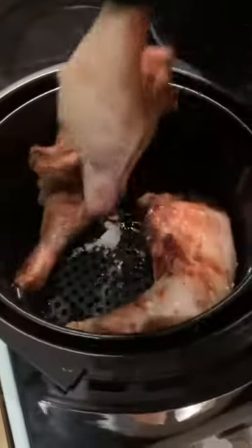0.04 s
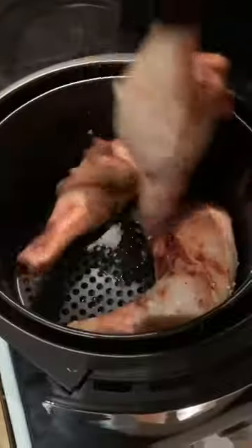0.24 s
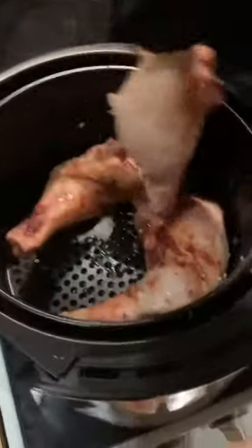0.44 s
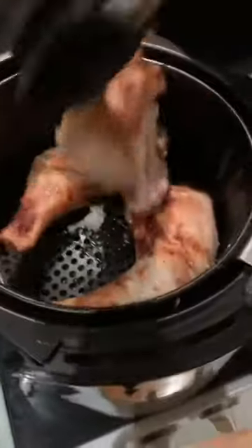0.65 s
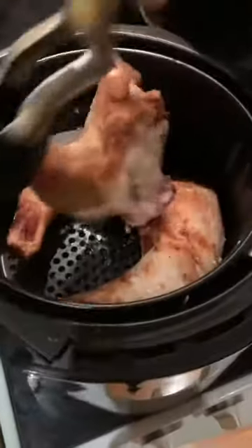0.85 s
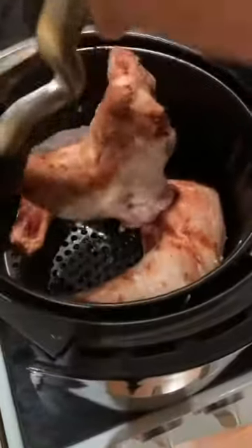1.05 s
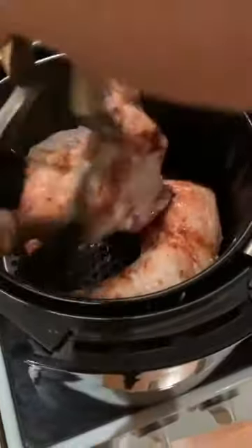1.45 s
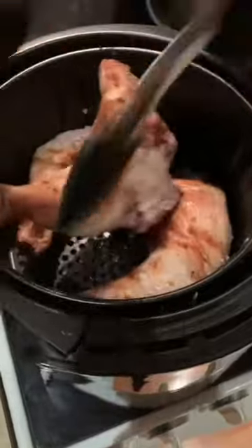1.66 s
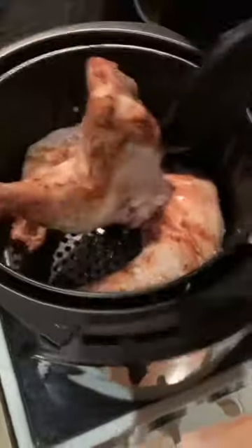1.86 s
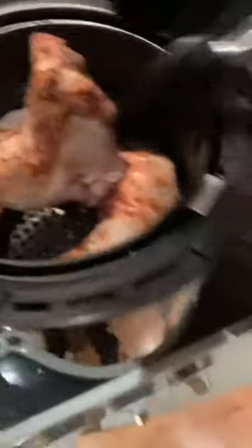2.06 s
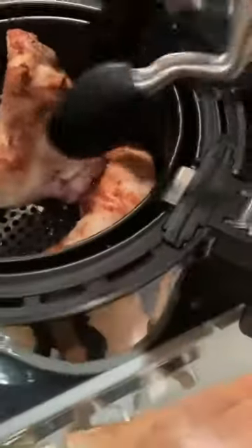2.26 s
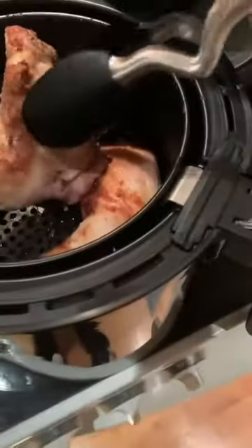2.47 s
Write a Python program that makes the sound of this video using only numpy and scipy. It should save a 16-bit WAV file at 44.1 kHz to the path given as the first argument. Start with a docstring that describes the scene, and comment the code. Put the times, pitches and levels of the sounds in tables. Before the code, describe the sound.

Metal tongs scrape an air fryer basket, close up in a quiet kitchen. After a soft rub of chicken, two hissing, ringing scrapes come at 0.2 and 0.6 seconds. From 0.8 to 1.6 seconds, wet skin clicks and squelches among soft bumps and a fainter scrape. A faint low hum rises, the tongs knock the plastic housing at 2.2 seconds, then lightly brush the basket.

```python
"""Metal tongs slide raw chicken around the perforated basket of an air fryer, close up in a quiet kitchen.
After a soft rub of meat, three scrapes hiss and ring the basket as the tongs catch and slip.
Wet skin clicks and squelches, and soft bumps shake the fryer's pot. Towards the end the tongs
knock the plastic housing and brush the basket while a low hum rises."""
import sys
import numpy as np
from scipy import signal
from scipy.fft import rfft, irfft
from scipy.io import wavfile

SR = 44100
rng = np.random.default_rng(int(sys.argv[2]) if len(sys.argv) > 2 else 0)


def wav_record(signal):
    """Record a signal, one row per channel, as 16-bit PCM in the file named by sys.argv[1]."""
    frames = np.transpose(np.atleast_2d(signal))
    bounded = np.clip(frames, -1, 1)
    # unit amplitude maps onto the largest positive 16-bit level
    quanta = np.round(bounded * 32767).astype(np.int16)
    wavfile.write(sys.argv[1], SR, quanta)


N = 110250

# Room tone. Each row: frequency in Hz, level in dB.
ROOM_COLOUR = [(20, -14), (36, 2.5), (70, 0.5), (120, -7.5), (190, -20.5), (330, -17.5), (650, -35),
               (1100, -39), (1800, -35), (2800, -40.5), (4200, -40), (5200, -48.5), (7500, -45),
               (14000, -49)]
# Low hum. Each row: time in seconds, pitch in Hz, level in dB.
HUM_PATH = [(0, 38.13, -71), (1.55, 38.95, -61.5), (1.849, 40.62, -58.5), (1.999, 43.45, -57.5),
            (2.12, 47.3, -49.5), (2.301, 53.4, -51.5), (2.5, 55.93, -51.5)]
# Appliance tones. Each row: pitch in Hz, level in dB.
APPLIANCE_TONES = [(97, -71), (248, -79.5), (345, -82.5), (441, -82), (4317, -93.5)]
# Envelopes of the meat's rub, the tongs' strokes and the skin's rustle.
# Each row: time in seconds, level in dB.
RUB_LEVEL = [(0, -54), (.06, -53), (.16, -58.5), (.26, -76.5)]
FIRST_PUSH = [(.15, -71), (.19, -51.5), (.219, -45), (0.23, -40.5), (.252, -37.5), (0.281, -42.5),
              (.318, -54), (.41, -52.5), (.455, -73)]
SECOND_PUSH = [(0.489, -64), (0.533, -50), (0.599, -41.5), (0.654, -42.5), (0.705, -60), (0.742, -53),
               (.785, -61.5), (0.829, -78)]
THIRD_PUSH = [(1.29, -75), (1.334, -57.5), (1.352, -59.5), (1.4, -56.5), (1.439, -61.5), (1.48, -56),
              (1.525, -61.5), (1.58, -69.5), (1.615, -89)]
BRUSH_PUSH = [(2.31, -100), (2.34, -82.5), (2.408, -86.5), (2.418, -64.5), (2.445, -79), (2.47, -87)]
RUSTLE_LEVEL = [(.83, -62), (.9, -58), (.985, -62.5), (1.04, -61), (1.15, -65), (1.215, -68),
                (1.245, -61.5), (1.34, -60.5), (1.56, -60), (1.65, -82)]
# Colours of the rub, the friction hiss and the rustle. Each row: frequency in Hz, level in dB.
RUB_EQ = [(200, 5), (500, 5), (900, -10), (1700, -4.5), (2300, 3), (2800, 5), (3900, 4.5), (4700, 4.5),
          (5500, 3), (6500, -7), (9000, -6.5), (14000, -7)]
HISS_EQ = [(60, -22), (200, -13.5), (480, -7.5), (800, -11.5), (1050, -22.5), (1400, -26), (2300, 0.5),
           (2760, -21), (3150, -5), (4800, 3), (6300, 0), (9300, -1), (11500, -6.5), (13200, -8),
           (15000, -15)]
RUSTLE_EQ = [(220, 11.5), (500, 2), (1200, -2.5), (1600, -1.5), (2300, -3), (2800, 2.5), (3600, 0.5),
             (5000, -10), (7500, -12), (10000, -14.5), (15000, -14)]
# Texture of the four strokes. Each row: pot ring in dB, grit in dB, grit centre in Hz, judder in dB.
STROKE_TEXTURES = [(-45, -25, 4800, 1), (-16.5, -10, 1780, 1.5), (-12, -8.5, 1900, 3),
                   (-26, -13.5, 1500, 2)]
# Basket modes. Each row: pitch in Hz, t60 in seconds, then level in dB at each of three rubbed spots.
BASKET_MODES = [(1106, 0.45, -25.5, -19, -6.5), (1177, .19, -9.5, -8.5, -11.5),
                (1607, 0.35, -4.5, -16.5, -25), (1783, 0.27, -17, -15, -17),
                (1864, 0.37, -15.5, -13.5, -7.5), (1906, 0.37, -17.5, -25, -10),
                (2117, 0.23, -36, -13, -26), (2317, 0.16, -14, -21, -15.5), (3125, 0.24, -16, -4.5, -6),
                (3225, 0.135, 0, -14.5, -14), (3439, 0.1, -10.5, -12, -15), (3805, .22, -10, -21.5, -17),
                (4140, 0.099, -22, -17, -31), (4310, 0.16, -7, -33.5, -15), (4560, 0.068, -8.5, -38, -28),
                (5825, 0.0873, -9.5, -41, -32), (6994, 0.2, -6, -11, -8.5), (7210, 0.156, -24.5, -9, -26)]
# Modes of the pot and the plastic housing. Each row: pitch in Hz, t60 in seconds, level in dB.
POT_MODES = [(144, 0.36, -7.5), (200, 0.22, -9.5), (263.3, 0.24, -6.5), (317, .22, -6.5),
             (459.5, 0.18, -11), (491.4, 0.2, -6), (1118, 0.21, -10), (1171, 0.12, -11),
             (1800, 0.11, -16.5)]
HOUSING_MODES = [(53, 0.29, -7), (183, 0.19, -12.5), (272, 0.19, -8.5), (330, 0.13, 0.5), (390.5, 0.11, 0),
                 (468.3, 0.19, -13), (598, 0.15, -10.5), (1042, 0.074, -9.5), (1183, 0.14, -18.5),
                 (1785, 0.092, -10), (1930, 0.11, -11.5)]
# Rasps of the tong tip. Each row: start in seconds, level in dB, centre in Hz, width in octaves,
# t60 in seconds, attack in seconds.
TIP_BITES = [(.2225, -26, 5430, .5, 0.12, 0.0034), (0.725, -38.5, 7940, 0.41, 0.14, 0.0093),
             (1.324, -45, 6100, 0.33, 0.099, 0.0094)]
# Clicks of skin and tong tips. Each row: start in seconds, level in dB, centre in Hz, t60 in seconds.
WET_CLICKS = [(.8405, -47, 9000, .012), (0.9173, -48.5, 11000, 0.0077), (0.926, -44.5, 9800, 0.0096),
              (0.945, -58, 6500, 0.011), (0.955, -50.5, 9600, 0.014), (0.9978, -46, 7450, 0.0089),
              (1.004, -55, 8200, 0.017), (1.031, -54, 5000, 0.02), (1.048, -41, 4650, 0.008),
              (1.057, -49, 3930, 0.014), (1.076, -59, 5470, .01), (1.111, -52, 9000, .008),
              (1.131, -56, 7000, .008), (1.155, -54, 5140, 0.009), (1.2324, -42, 4470, 0.021),
              (1.265, -57, 7000, 0.011), (1.361, -38, 8900, 0.0093)]
# Bumps on the pot. Each row: start in seconds, level in dB, then relative boom and wet slap in dB.
POT_BUMPS = [(0.8624, -36.5, -1, -7), (1.2503, -48, -10, -9), (1.3605, -40, -1.5, -14)]
# Dull thud of flesh. Each row: band centre in Hz, level in dB.
THUD_BANDS = [(90, 2), (180, 1.5), (350, -5), (700, -8), (1200, -21.5), (2000, -11.5), (3200, -15.5)]
# Stereo image. Each row: frequency in Hz, phase lead of the left microphone over the right in radians.
LEFT_LEAD = [(60, 0), (380, -.8), (720, -2.4), (1000, -5.8), (1700, -6.1), (2150, -5.5), (2600, -8.7),
             (3250, -9.2), (3800, -6), (4300, -4.1), (4750, -3.9), (5000, -2.9), (6400, -.4), (7500, .3),
             (8700, 1.7), (9400, 3), (10200, 3.3), (11800, 6), (13200, 6.7), (14500, 9.3)]
# Stereo balance. Each row: frequency in Hz, left over right in dB.
LEFT_BALANCE = [(70, 0), (200, -3.5), (600, -5.5), (1300, -5.5), (2500, 1.5), (6000, -.1)]
# Colour of the kitchen's reverb. Each row: frequency in Hz, gain in dB.
KITCHEN_EQ = [(70, -14), (220, -.5), (800, 8.5), (5000, -9)]

SLIPS_PER_S, SLIP_SCATTER_DB = 6000, 2


def amp(db):
    """Decibels to gain."""
    return 10 ** (np.asarray(db) / 20)


def unit(x):
    """Scale to rms 1."""
    return x / np.sqrt(np.mean(x ** 2))


def clock():
    """Time of every sample in seconds."""
    return np.arange(N) / SR


def level_curve(points):
    """Gain along (s, dB) points, silent outside them."""
    s, db = np.array(points).T
    return amp(np.interp(clock(), s, db, left=-150, right=-150))


def on_bins(points):
    """Join (Hz, value) points on a log-frequency axis."""
    hz, value = np.array(points).T
    return np.interp(np.log(np.arange(N // 2 + 1) * SR / N + 1), np.log(hz), value)


def colour(x, points):
    """EQ x along (Hz, dB) points, at rms 1."""
    return unit(irfft(rfft(x) * amp(on_bins(points)), N))


def band_noise(hz, octaves):
    """Noise in a bell-shaped band, rms 1."""
    away = np.log2((np.arange(N // 2 + 1) * SR / N + 1) / hz) / octaves
    return unit(irfft(rfft(rng.standard_normal(N)) * np.exp(-.5 * away ** 2), N))


def decay(start, t60, rise=.00011):
    """Quick attack, then a fall of 60 dB every t60 seconds."""
    age = np.maximum(clock() - start, 0)
    return (1 - np.exp(-age / rise)) * np.exp(-np.log(1000) * age / t60)


def ring(start, hz, t60, rise=.0004):
    """One struck mode."""
    return decay(start, t60, rise) * np.sin(2 * np.pi * hz * (clock() - start))


def resonate(x, hz, t60):
    """Drive one mode with x; rms 1."""
    pole = np.exp((2j * np.pi * hz - np.log(1000) / t60) / SR)
    return unit(signal.lfilter([1], [1, -2 * pole.real, abs(pole) ** 2], x))


def through(x, response):
    """Pass x through a response of unit energy."""
    return signal.fftconvolve(x, response / np.sqrt(np.sum(response ** 2)))[:N]


def grains(per_s, scatter_db):
    """Tiny clicks of random time and size, rms 1."""
    hits = rng.random(N) < per_s / SR
    sizes = amp(scatter_db * np.clip(rng.standard_normal(N), -2, 2))
    return unit(hits * sizes * rng.choice([-1, 1], N))


def wander(per_s):
    """Smooth random drift with a spread near 1."""
    return np.interp(clock() * per_s, np.arange(N), rng.standard_normal(N))


def low_hum():
    """A low hum that climbs in pitch and swells."""
    s, hz, db = np.array(HUM_PATH).T
    phase = 2 * np.pi * np.cumsum(np.interp(clock(), s, hz)) / SR
    return unit(np.sin(phase)) * amp(np.interp(clock(), s, db) + .7 * wander(9.7))


def room_tone():
    """A quiet, dark bed of noise, narrow in the bass and wide above."""
    mid, side = (colour(rng.standard_normal(N), ROOM_COLOUR) for _ in range(2))
    side = irfft(rfft(side) * amp(on_bins([(80, -10), (600, -1)])), N)
    return amp(-59.5) * np.array([mid + side, mid - side])


def appliances():
    """Faint, slightly unsteady tones of kitchen appliances."""
    return sum(amp(db + 2 * wander(4.5)) * unit(np.sin(2 * np.pi * hz * clock() + .5 * wander(9.7)))
               for hz, db in APPLIANCE_TONES)


def meat_rub():
    """Tiny slips blur into a soft rub as the first piece moves."""
    return level_curve(RUB_LEVEL) * colour(grains(SLIPS_PER_S, SLIP_SCATTER_DB), RUB_EQ)


def sheet_response():
    """The perforated sheet's shimmer: many close, weak modes dying away together."""
    count, t60 = 400, .087
    age = np.arange(SR // 3) / SR
    pitches, sizes = rng.uniform(703, 11940, count), rng.standard_normal(count)
    modes = sum(size * np.sin(2 * np.pi * hz * age) for hz, size in zip(pitches, sizes))
    return modes * np.exp(-np.log(1000) * age / t60)


def basket_ring(friction, spot):
    """Friction rings the basket; the pressing tongs bend its pitch and shifting contact makes it waver."""
    bend_s, waver_db = .00006, 1
    out, t = 0, clock()
    for hz, t60, *spot_db in BASKET_MODES:
        bent = np.interp(t + bend_s * wander(70), t, resonate(friction, hz, t60))
        out += amp(spot_db[spot]) * unit(bent * amp(waver_db * wander(55)))
    return out


def scrapes():
    """Dense, uneven slips hiss and ring the sheet, basket and pot; coarser catches add grit."""
    sheet, shimmer_gain = sheet_response(), amp(-1.5)
    pot = sum(amp(db) * ring(0, hz, t60) for hz, t60, db in POT_MODES)
    forces, spots = [FIRST_PUSH, SECOND_PUSH, THIRD_PUSH, BRUSH_PUSH], [0, 1, 2, 0]
    out = 0
    for force, spot, (pot_db, grit_db, grit_hz, judder_db) in zip(forces, spots, STROKE_TEXTURES):
        push = level_curve(force) * amp(judder_db * wander(160))
        slips = grains(SLIPS_PER_S, SLIP_SCATTER_DB)
        friction = push * slips
        hiss = push * colour(slips, HISS_EQ)
        shimmer = shimmer_gain * np.std(hiss) * unit(through(hiss, sheet))
        catches = push * grains(per_s=900, scatter_db=4)
        grit = through(catches, band_noise(grit_hz, octaves=1) * decay(0, t60=.072))
        out += (hiss + shimmer) / np.hypot(1, shimmer_gain) + amp(grit_db) * grit
        out += amp(pot_db) * through(friction, pot) + np.std(push) * basket_ring(friction, spot)
    return out


def tong_tip():
    """The tip bites the sheet with bright rasps, then squeaks as it slides off the third scrape."""
    rasps = sum(amp(db) * band_noise(hz, octaves) * decay(s, t60, rise)
                for s, db, hz, octaves, t60, rise in TIP_BITES)
    squeak = amp(-42.5) * ring(start=1.56, hz=1925, t60=.15, rise=.023)
    return rasps + squeak


def wet_skin():
    """Skin under the tongs: crisp, sticky clicks with faint tails over a fine rustle."""
    rustle_gain = level_curve(RUSTLE_LEVEL) * amp(1.6 * wander(44.7))
    out = rustle_gain * colour(grains(per_s=12000, scatter_db=2), RUSTLE_EQ)
    for s, db, hz, t60 in WET_CLICKS:
        envelope = decay(s, t60) + amp(-19.5) * decay(s, t60=.17)
        out += amp(db) * band_noise(hz, octaves=.7) * envelope
    return out


def bumps():
    """Meat and tongs bump the pot: a wet slap, then ever lower thud and ring as the weight settles."""
    lag_cycles, boom_lag_s = 1.3, .024
    bands = [(hz, amp(db) * band_noise(hz, octaves=.49)) for hz, db in THUD_BANDS]
    crackle = colour(grains(per_s=2800, scatter_db=3), HISS_EQ)
    out = 0
    for s, db, boom_db, slap_db in POT_BUMPS:
        slap = amp(slap_db) * crackle * decay(s, t60=.14, rise=.003)
        thud = sum(band * decay(s + lag_cycles / hz, t60=.13, rise=1 / hz) for hz, band in bands)
        pot = sum(amp(mode_db) * ring(s + lag_cycles / hz, hz, t60, rise=1 / hz)
                  for hz, t60, mode_db in POT_MODES)
        boom = amp(boom_db) * ring(s + boom_lag_s, hz=61, t60=.46, rise=.0055)
        out += amp(db) * (slap + thud + pot + boom)
    return out


def squelch(start):
    """An air pocket squeezes out of the meat: a rising blip with a wet edge and the pot ringing under it."""
    hz, glide_hz_per_s = 1095, 2400
    age = clock() - start
    pocket = np.sin(2 * np.pi * (hz + .5 * glide_hz_per_s * age) * age) * decay(start, t60=.037, rise=.004)
    ooze = amp(-10.5) * band_noise(hz, octaves=.23) * decay(start - .015, t60=.11, rise=.039)
    pot = amp(-19) * ring(start, hz=492.7, t60=.2, rise=.004)
    return amp(-34.5) * (pocket + ooze + pot)


def housing_knock(start):
    """The tongs strike the plastic housing: a short crack over a hollow body."""
    body = sum(amp(db) * ring(start, hz, t60, rise=1 / hz) for hz, t60, db in HOUSING_MODES)
    crack = amp(-7.5) * band_noise(hz=1020, octaves=1) * decay(start, t60=.072, rise=.001)
    return amp(-40) * (body + crack)


def stereo_image(x):
    """Each frequency reaches the two microphones with its own phase and level."""
    lead, balance_db = on_bins(LEFT_LEAD), on_bins(LEFT_BALANCE)
    return np.array([irfft(rfft(x) * amp(side * balance_db) * np.exp(1j * side * lead), N)
                     for side in (.5, -.5)])


def pot_walls(x):
    """Quick, bright reflections inside the pot."""
    echoes = band_noise(hz=6840, octaves=1.7) * decay(.00085, t60=.04)
    return amp(-11) * through(x, echoes)


def kitchen_reverb(x):
    """A short, diffuse tail, fullest in the mids."""
    tail = through(x, rng.standard_normal(N) * decay(.004, t60=.38))
    return irfft(rfft(tail) * amp(on_bins(KITCHEN_EQ) - 10), N)


def scene():
    """The fryer up close in stereo, with short pot and kitchen tails, over the quiet room."""
    fryer = scrapes() + tong_tip() + bumps() + housing_knock(start=2.175)
    fryer += wet_skin() + squelch(start=1.0945) + meat_rub()
    tails = np.array([pot_walls(fryer) + kitchen_reverb(fryer) for _ in range(2)])
    return stereo_image(fryer) + tails + low_hum() + room_tone() + appliances()


def record(dry):
    """The phone cuts the deepest bass and the very top."""
    low_cut = signal.butter(2, 25, "highpass", fs=SR, output="sos")
    high_cut = signal.ellip(8, .2, 70, 15400, fs=SR, output="sos")
    return signal.sosfilt(high_cut, signal.sosfilt(low_cut, dry))


dry = scene()
out = record(dry)
wav_record(out)
```